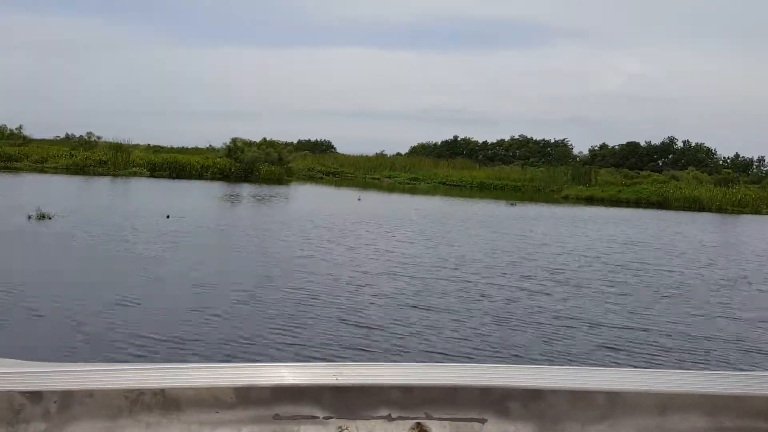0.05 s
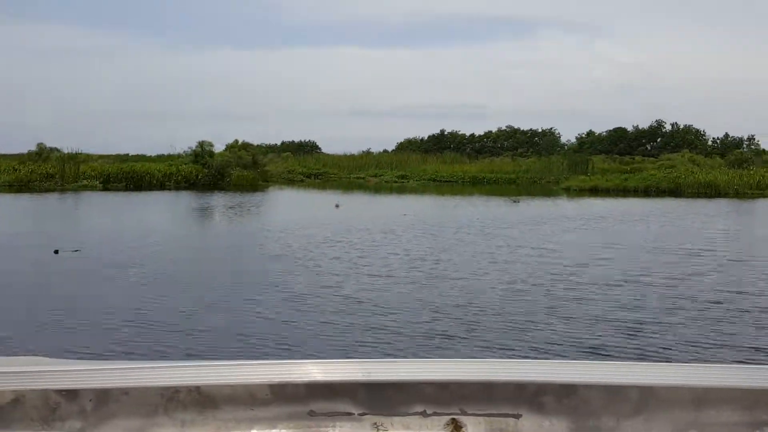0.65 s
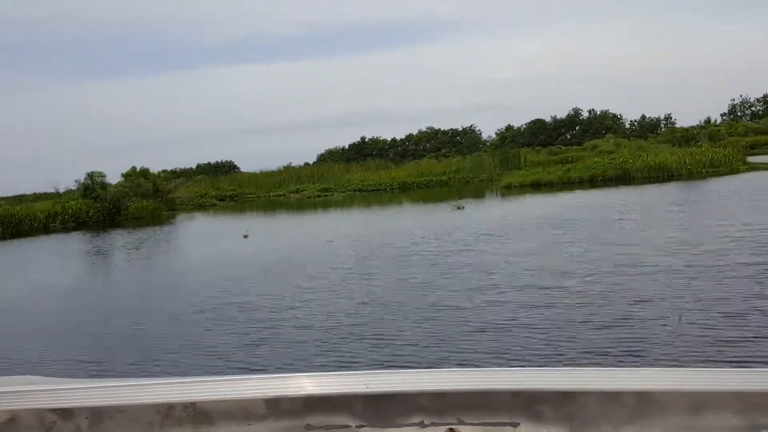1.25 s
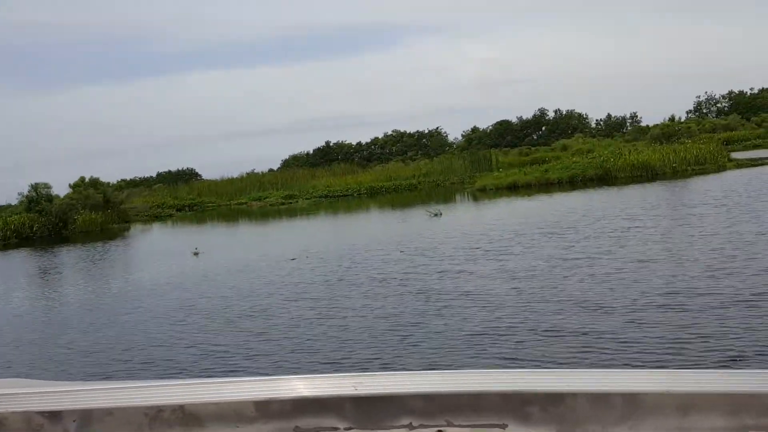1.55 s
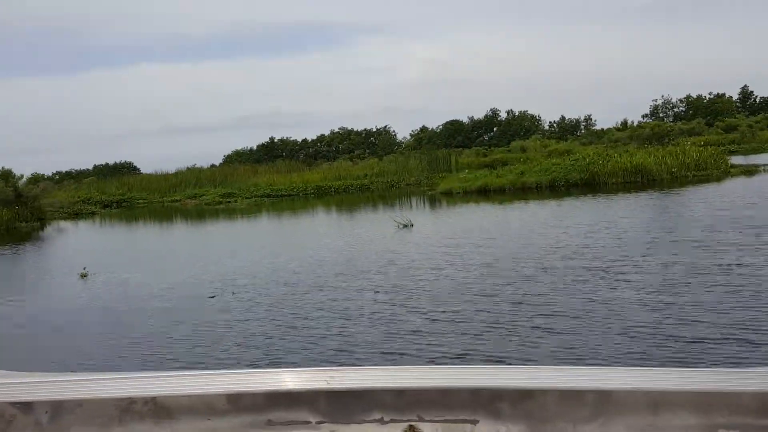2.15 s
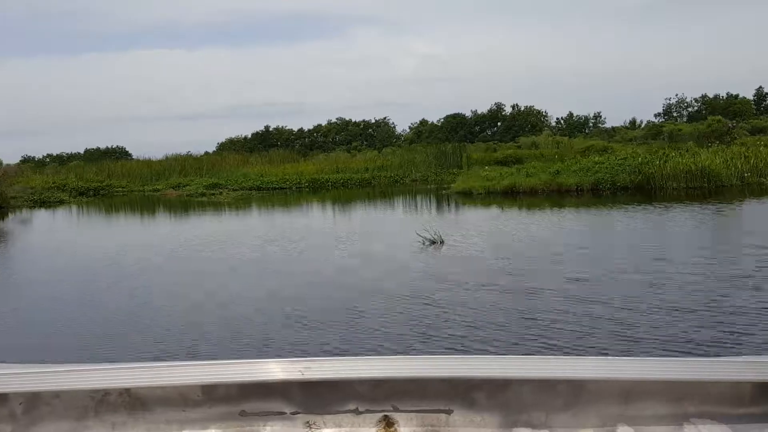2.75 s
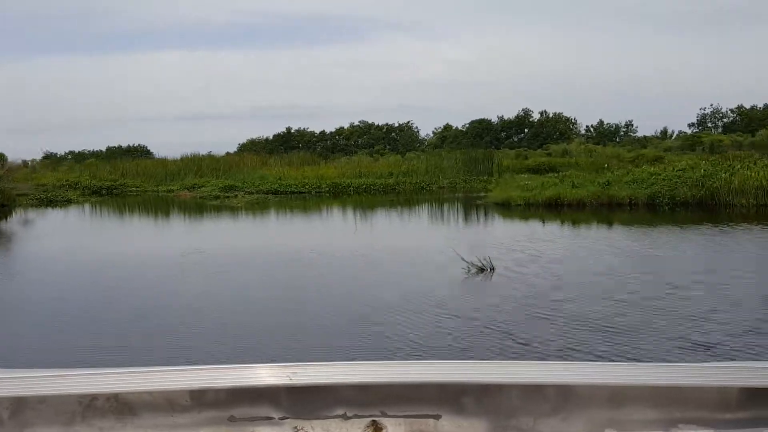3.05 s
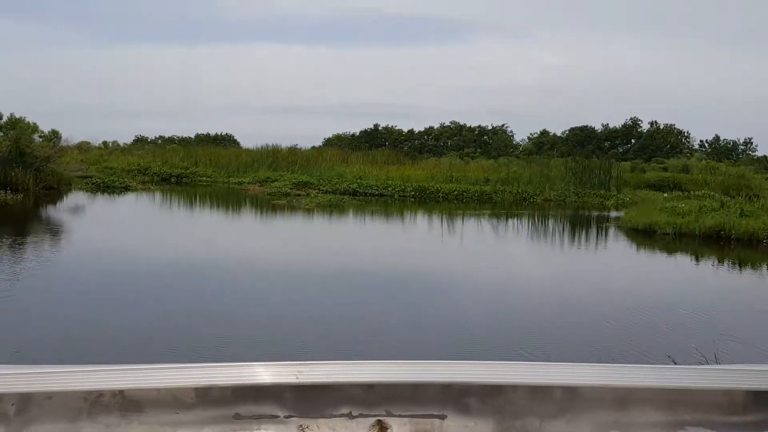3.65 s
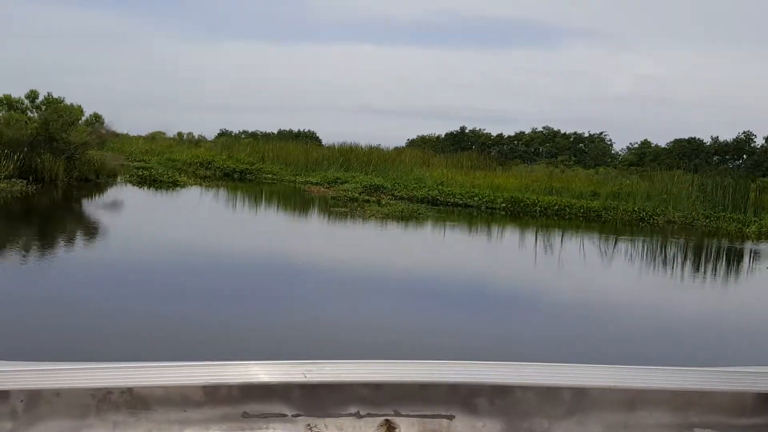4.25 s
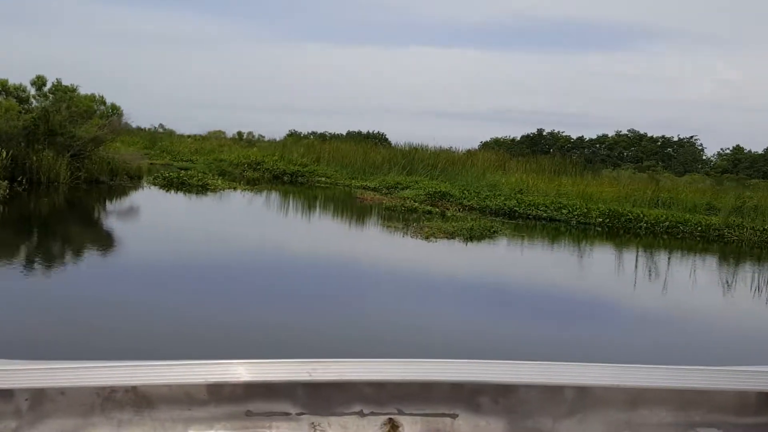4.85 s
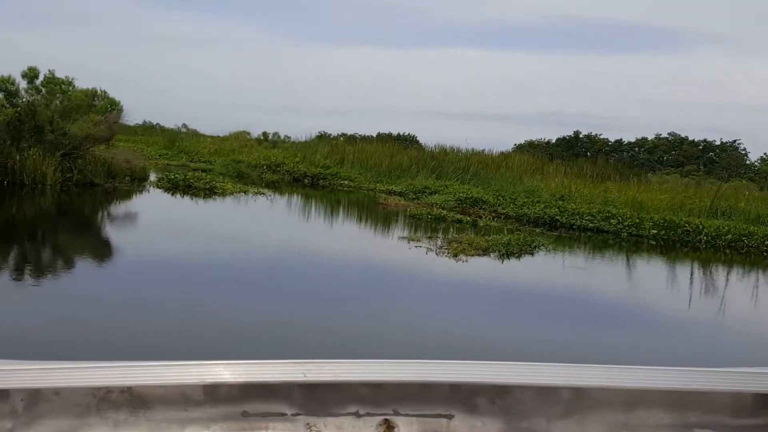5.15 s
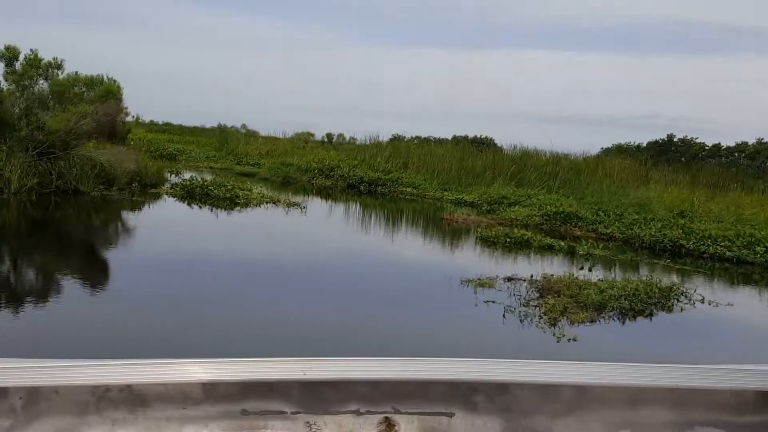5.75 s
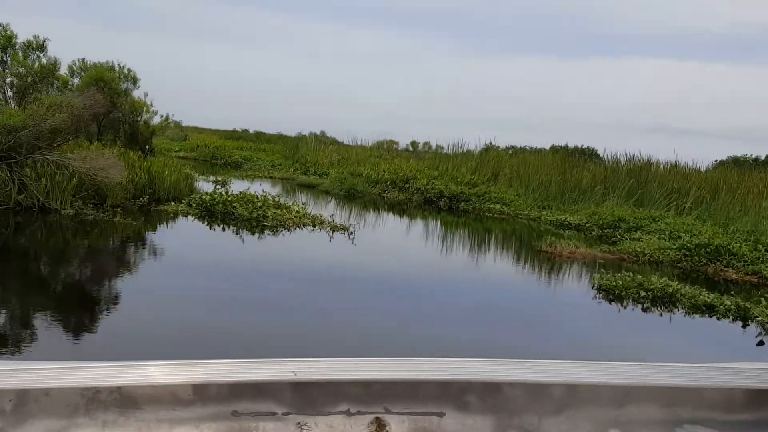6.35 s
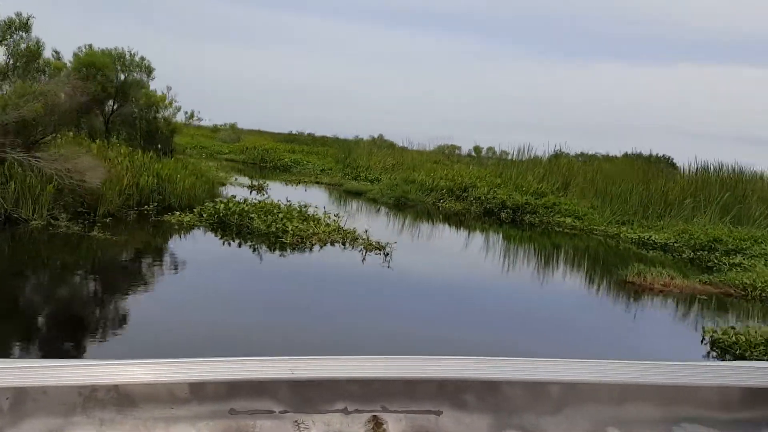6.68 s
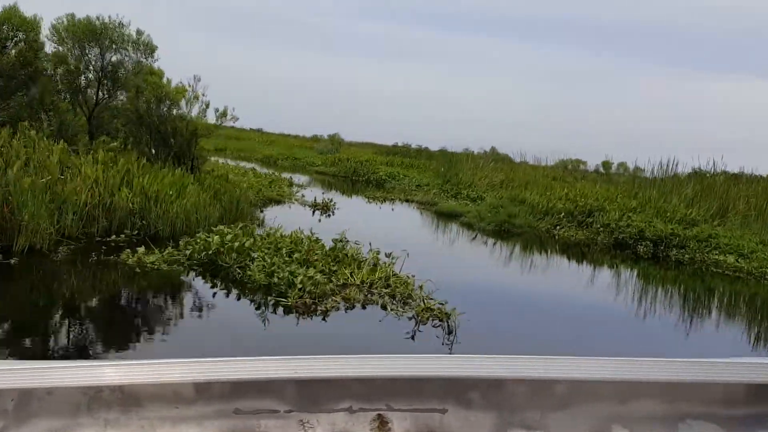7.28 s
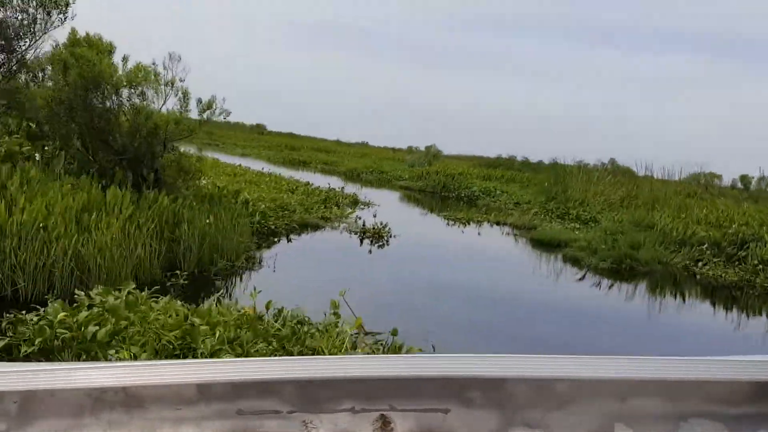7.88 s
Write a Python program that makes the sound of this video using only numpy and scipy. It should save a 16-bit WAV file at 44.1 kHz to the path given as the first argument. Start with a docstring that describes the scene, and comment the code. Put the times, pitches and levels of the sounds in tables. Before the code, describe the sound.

An airboat cruises over a calm marsh, heard from its front seats. Its big engine holds a loud, low, throbbing drone at one pitch from start to finish, blended with a rough exhaust roar and the buzz of the propeller. The blades chop the air into a grainy hiss, with a faint gear whine above. The drone swells and eases slightly as the boat turns.

```python
"""An airboat cruises over a calm marsh, heard from its front seats.
From the start a V8 drones at steady throttle and beats against the slower, geared-down propeller behind
it. Throughout, the exhaust roar surges once an engine cycle, the blades chop the rushing air into a
grainy hiss, and the reduction drive whines faintly. The drone swells and fades as the boat turns:
it is strongest just after 6 s and sinks in the last moment, at 8 s."""
import sys
import numpy as np
from scipy import signal
from scipy.fft import rfft, irfft
from scipy.io import wavfile

SR = 44100
rng = np.random.default_rng(int(sys.argv[2]) if len(sys.argv) > 2 else 0)


def file_out(sig):
    """Save sig as 16-bit WAV at sys.argv[1]."""
    # one column per channel
    cols = np.atleast_2d(sig).T
    # limit, then scale
    lim = np.clip(cols, -1, 1)
    pcm = np.round(lim * 32767).astype(np.int16)
    wavfile.write(sys.argv[1], SR, pcm)


N = 353682
TIME = np.arange(N) / SR

# Exhaust harmonics: order (multiple of the engine cycle rate), relative_level_db
EXHAUST_ORDERS = [(3, -35.9), (4, -50.1), (5, -36.3), (6, -36.0), (7, -32.9), (8, -13.4), (9, -27.5),
                  (10, -21.7), (11, -18.9), (12, -35.1), (13, -34.5), (14, -41.3), (15, -38.5), (16, -26.7),
                  (17, -35.7), (18, -30.1), (19, -36.9), (20, -41.6), (21, -36.1), (22, -42.8), (24, -36.1),
                  (26, -49.4), (28, -42.8), (29, -44.8), (30, -43.5), (31, -45.9), (32, -31.3), (33, -41.4),
                  (34, -42.5), (36, -46.1), (37, -46.8), (38, -47.6), (42, -49.6), (56, -38.7), (57, -47.7)]
# Swell of the firing tone and the 10th order as the boat turns: time_s, gain_db
DRONE_SWELL = [(0.0, -1.2), (1.5, 0.3), (2.1, -1.2), (2.4, 0.9), (3.3, -0.3), (3.6, 1), (3.8, -1.8),
               (4.7, -0.9), (4.8, 2.5), (5.0, -1), (6.2, 3.0), (6.9, -1.8), (7.8, 0.9), (8.02, -4.5)]
# Swell of the 11th order, which beats against the firing tone and makes it throb: time_s, gain_db
THROB_SWELL = [(0.0, -0.1), (1.6, -0.5), (3.1, -0.5), (3.3, -1.8), (5.5, 2.5), (6.1, -2), (8.02, 1)]


def exhaust(cycles, load_db, firing_order=8, rasp_order=24):
    """Harmonic series of a pulse train: eight firings a cycle drone; unequal pipes add other orders."""
    drone_db, throb_db = curve(DRONE_SWELL), curve(THROB_SWELL)
    swell_db = {firing_order: drone_db, 10: drone_db, 11: throb_db}
    out = np.zeros((2, N))
    for order, level_db in EXHAUST_ORDERS:
        # the pipes smear the pulse over the cycle, but the firing tone and its overtones stay lined up
        phase_turns = order * cycles + 0.5 - 27 / 128 * order ** 2
        # the firing tone is steadier than the orders around it
        lift_db, wander, spread = (0.26, 0.12, 0.071) if order == firing_order else (0.63, 0.23, 0.13)
        # the upper orders rasp more under load
        change_db = load_db if order >= rasp_order else swell_db.get(order, 0)
        out += partial(phase_turns, level_db + lift_db + change_db, wander, spread, width_hz=9)
    return out


# Propeller tones: harmonic (multiple of the blade-pass rate), relative_level_db
BLADE_HARMONICS = [(1, -32.8), (2, -27.4), (3, -30.0), (4, -24.7), (5, -22.0), (6, -37.8), (7, -29.9),
                   (8, -30.1), (9, -39.7), (10, -36.5), (11, -42.3), (12, -39.3), (13, -39.4), (14, -45.7),
                   (15, -48.1), (16, -44.7)]


def propeller(passes, load_db, lift_db=0.3, load_follow=0.95):
    """Blade loading noise: blades slap through the engine's wake, louder when they push more air."""
    out = np.zeros((2, N))
    for harmonic, level_db in BLADE_HARMONICS:
        phase_turns = harmonic * passes + rng.random()
        loaded_db = level_db + lift_db + load_follow * load_db
        wander = 0.12 * np.sqrt(harmonic)  # turbulence shakes the higher overtones most
        out += partial(phase_turns, loaded_db, wander, spread=0.015 * harmonic, width_hz=8)
    return out


# Spectrum of the rough roar of exhaust and hull: frequency_hz, relative_density_db
ROAR_SPECTRUM = [(20, -23), (38, -20), (60, -15), (100, -9.5), (140, -6), (190, -6), (260, -6), (400, -10),
                 (530, -9), (680, -14.5), (830, -15), (930, -15), (1010, -19.5), (1500, -29.5),
                 (3000, -41.5)]
# Likeness of the roar at left and right: frequency_hz, correlation (0 to 1)
ROAR_CORRELATION = [(60, 0.86), (200, 0.83), (400, 1), (700, 0.66), (1300, 0.19), (2500, 0)]


def roar(cycles, passes, load_db, level_db=-22, lope_db=0.8, chop_db=0.6, load_follow=0.97):
    """Amplitude-modulated turbulence: low noise surges once an engine cycle and twice a blade pass."""
    left, independent = rfft(rng.standard_normal((2, N)))
    correlation = spectra(ROAR_CORRELATION)[0]
    right = correlation * left + np.sqrt(1 - correlation ** 2) * independent
    noise = irfft(np.array([left, right]) * gain(spectra(ROAR_SPECTRUM)), N)
    pulse_db = lope_db * cosine(cycles) + chop_db * cosine(2 * passes)
    return gain(level_db + load_follow * load_db) * unit_rms(noise * gain(pulse_db))


# Spectrum of the rushing air: frequency_hz, left_relative_density_db, right_relative_density_db
AIR_SPECTRUM = [(300, -20, -16), (1000, 0, -6), (1420, 0, 0), (2000, -1.5, -2), (2660, 0.5, -3),
                (3460, -5, -7.5), (4480, -6.5, -10), (5400, -8.5, -16), (6520, -8.5, -14),
                (7200, -17, -13.5), (8600, -32.5, -7.5), (10000, -24.5, -14), (12070, -15, -6.5),
                (16100, -18.5, -17)]


def tip_hiss(cycles, passes, rush_db, trim_db=-3, chop_db=1.0, slap_db=1.65, lope_db=0.14):
    """Broadband aerodynamic noise: the blade tips' hiss swells at each pass and flutters with gusts."""
    noise = irfft(rfft(rng.standard_normal((2, N))) * gain(spectra(AIR_SPECTRUM)), N)
    swing = cosine(passes)
    slap = ((1 + swing) / 2) ** 16  # one narrow peak a pass
    blade_db = chop_db * swing + slap_db * slap
    engine_db = lope_db * (cosine(cycles) + cosine(2 * cycles))
    gust_db = 1.16 * upsample(drift(width_hz=45).real)
    return gain(rush_db + trim_db) * unit_rms(noise * gain(blade_db + engine_db + gust_db))


def air_crackle(load_db, level_db=-49, bursts_per_s=900, spread_db=5.5, highpass_hz=8500):
    """Shot noise: small, sharp, random bursts in the churned air give the hiss a fine grain."""
    sizes = gain(spread_db * np.minimum(rng.exponential(1, (2, N)), 4))
    signs = rng.choice([-1, 1], (2, N))
    onsets = rng.random((2, N)) < bursts_per_s / SR
    bursts = irfft(rfft(sizes * signs * onsets) * gain(spectra(AIR_SPECTRUM)), N)
    treble = signal.lfilter(*signal.butter(2, highpass_hz, "high", fs=SR), bursts)
    return gain(level_db + load_db) * unit_rms(treble)


# Mesh tones before their swell: order (multiple of the engine cycle rate), width_hz, left_db, right_db
MESH_TONES = [(96.7, 26, -44.5, -50), (191.6, 36, -46, -51.5), (292, 40, -56, -63)]
# Swell of the drive's whine: time_s, gain_db
WHINE_SWELL = [(0, 1), (1.2, 0.5), (2.3, -3.5), (4.2, 1.5), (5, -0.5), (6.6, -3), (8.02, -1)]


def drive_whine(cycles):
    """Gear meshing: the reduction drive's tones, blurred by random modulation, come and go."""
    out = np.zeros((2, N))
    for order, width_hz, *levels_db in MESH_TONES:
        mesh = np.exp(2j * np.pi * order * cycles)
        for channel, level_db in enumerate(levels_db):
            band = (mesh * upsample(drift(width_hz))).real
            out[channel] += gain(level_db) * unit_rms(band)
    return out * gain(curve(WHINE_SWELL))


def partial(phase_turns, level_db, wander, spread, width_hz, left_delay_s=8e-5):
    """Line broadening: a tone wanders in strength and phase, and reaches the left side a little late."""
    common = 1 + wander * drift(width_hz)
    side = spread * drift(width_hz=1.3)
    pitch_hz = (phase_turns[-1] - phase_turns[0]) * SR / N
    delay = np.exp(-2j * np.pi * pitch_hz * left_delay_s)
    carrier = np.sqrt(2) * gain(level_db) * np.exp(2j * np.pi * phase_turns)
    envelopes = delay * (common + side), common - side
    return np.array([(carrier * upsample(unit_rms(envelope))).real for envelope in envelopes])


def drift(width_hz, size=4096):
    """Narrowband noise: a slow complex fluctuation of rms 1 on a coarse time grid."""
    hz = np.fft.fftfreq(size, N / SR / size)
    white = rng.standard_normal(size) + 1j * rng.standard_normal(size)
    return unit_rms(np.fft.ifft(white / (1 + (2 * hz / width_hz) ** 2)))


def upsample(coarse):
    """Linear interpolation from the coarse time grid to every sample."""
    return np.interp(TIME, np.linspace(0, N / SR, len(coarse)), coarse)


def curve(rows):
    """Linear interpolation of (time_s, value) rows at every sample."""
    return np.interp(TIME, *np.transpose(rows))


def spectra(rows):
    """Log-frequency interpolation of each value column at every FFT bin."""
    frequency_hz, *columns = np.transpose(rows)
    bin_hz = np.fft.rfftfreq(N, 1 / SR)
    return np.array([np.interp(np.log(bin_hz + 1), np.log(frequency_hz + 1), c) for c in columns])


def cosine(turns):
    """Simple harmonic motion, one period a turn."""
    return np.cos(2 * np.pi * turns)


def gain(db):
    """Decibels to amplitude ratio."""
    return 10 ** (np.asarray(db) / 20)


def unit_rms(x):
    """Normalisation to rms 1."""
    return x / np.sqrt(np.mean(np.abs(x) ** 2) + 1e-20)


# Four-stroke engine speed, sagging and recovering a little at held throttle: time_s, cycle_rate_hz
ENGINE_SPEED = [(0.0, 16.357), (1.4, 16.401), (1.7, 16.404), (2.0, 16.346), (3.0, 16.474), (3.7, 16.381),
                (4.2, 16.433), (4.9, 16.33), (5.4, 16.409), (6.9, 16.478), (7.8, 16.342), (8.02, 16.421)]
# Strength of the rushing air: time_s, relative_level_db
AIR_RUSH = [(0.0, -29), (0.7, -28), (1.2, -29.4), (2.2, -28), (2.5, -29.0), (3.4, -28.4), (4.0, -28.5),
            (4.2, -27), (4.4, -28.5), (4.7, -27.5), (4.8, -29.5), (5.4, -28.5), (7.0, -30.5), (7.2, -29.0),
            (7.8, -29.1), (8.02, -27)]


def scene(passes_per_cycle=2.6182):
    """Superposition: one crankshaft times the tones and pulses; the load follows the rushing air."""
    cycles = np.cumsum(curve(ENGINE_SPEED)) / SR
    passes = cycles * passes_per_cycle  # blade passes so far
    rush_db = curve(AIR_RUSH)
    load_db = rush_db - rush_db.mean()
    tones = exhaust(cycles, load_db) + propeller(passes, load_db) + drive_whine(cycles)
    noise = roar(cycles, passes, load_db) + tip_hiss(cycles, passes, rush_db) + air_crackle(load_db)
    return tones + noise


def record(dry, cutoff_hz=15800):
    """Soft saturation rounds the loudest peaks; a low-pass filter then limits the band."""
    rounded = dry / (1 + dry ** 10) ** (1 / 10)
    lowpass = signal.firwin(1023, cutoff_hz, window=("kaiser", 9), fs=SR)
    return signal.oaconvolve(rounded, lowpass[None], "same")


dry = scene()
out = record(dry)
file_out(out)
```